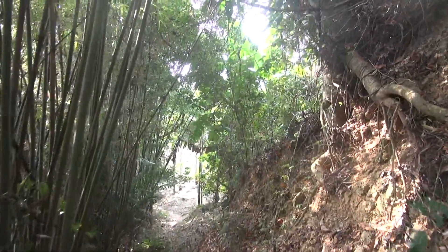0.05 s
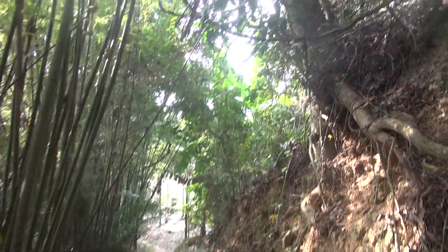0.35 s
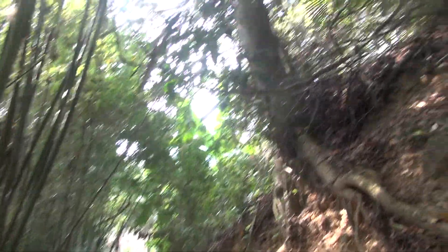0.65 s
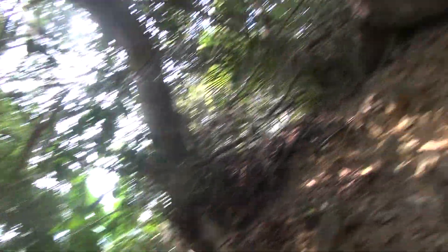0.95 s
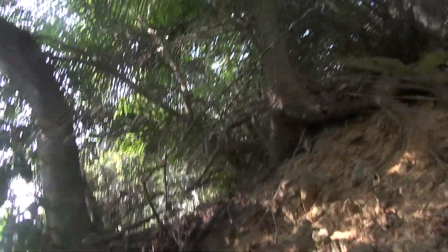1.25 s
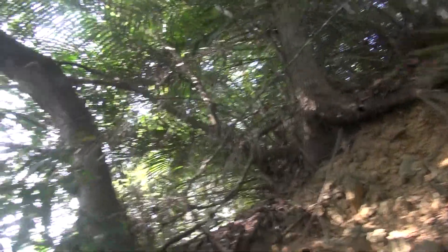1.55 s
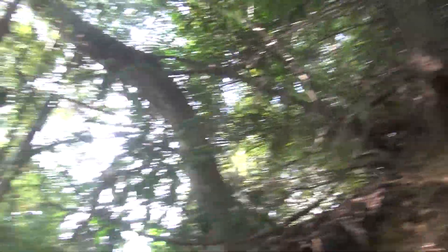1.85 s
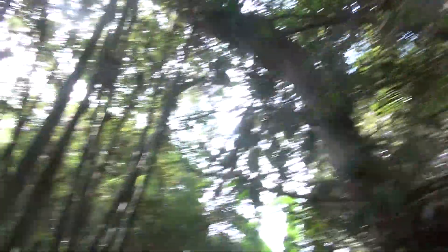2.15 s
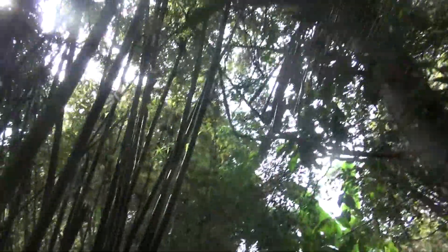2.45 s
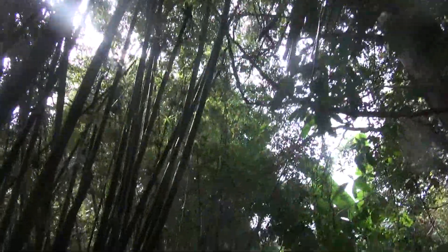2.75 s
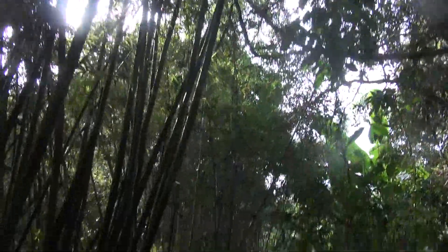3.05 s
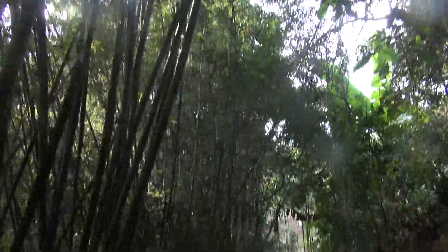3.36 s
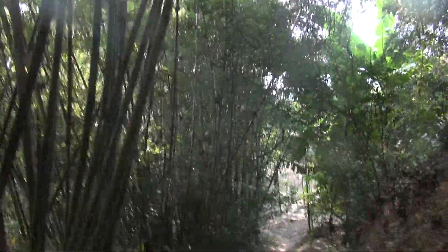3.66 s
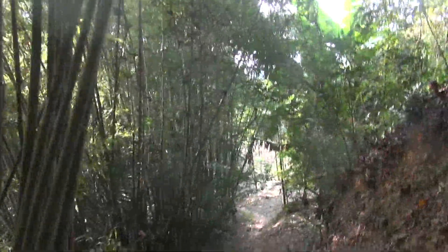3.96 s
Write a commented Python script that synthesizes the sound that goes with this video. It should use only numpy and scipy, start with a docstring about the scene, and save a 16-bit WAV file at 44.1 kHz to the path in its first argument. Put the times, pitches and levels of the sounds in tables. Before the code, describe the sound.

A creaking, insect-like rattle rises at about 0.7 seconds, slightly left, pulsing roughly eight times a second with a hollow, raspy tone. It roughens, weakens after 2.8 seconds and stops near 3.7. Close by, a twig snap and leaf crunch come at 0.2 seconds, then soft bumps; more snaps, crunches and shuffling follow from 3.2, with a bump at 3.7. A very high hiss and low outdoor murmur continue throughout.

```python
"""A shaded bamboo grove. A creaking rattle, perhaps an insect, swells about eight times a second:
in each swell a train of uneven snaps speeds up and slackens, ringing a small hollow body under a
higher rasp and a thin fizz. Close by, twigs snap, dry leaves crunch, and there are a few soft bumps
and some shuffling. Behind it all sit a very high, steady hiss and a low outdoor murmur."""
import sys
import numpy as np
from scipy import signal
from scipy.fft import rfft, irfft
from scipy.io import wavfile

SR = 44100
rng = np.random.default_rng(int(sys.argv[2]) if len(sys.argv) > 2 else 0)


def inscribe(sig):
    """Save sig as 16-bit PCM at rate SR to the path in sys.argv[1].

    A 1-D sig is mono; a 2-D sig holds one channel per row.
    Samples are clipped to [-1, 1] before scaling.
    """
    pcm = np.round(np.clip(np.atleast_2d(sig).T, -1, 1) * 32767)
    wavfile.write(sys.argv[1], SR, pcm.astype(np.int16))


N = 176400
T = np.arange(N) / SR
HZ = np.maximum(np.fft.rfftfreq(N, 1 / SR), 1)

# The rattle's swells: (peak time [s], snap rate at the peak [1/s], relative level [dB],
# upper rasp pitch [Hz], upper rasp level [dB])
SWELLS = [(.735, 290, -56, 2540, -58), (.809, 300, -46, 2650, -51), (.897, 282, -41, 2590, -51.5),
          (.989, 283, -39.5, 2640, -50), (1.098, 303, -36, 2580, -49.5), (1.208, 296, -36, 2570, -46),
          (1.327, 302, -35.5, 2596, -49), (1.452, 318, -35.5, 2700, -50), (1.578, 296, -35.5, 2630, -47.5),
          (1.70, 303, -36.5, 2592, -47.5), (1.827, 297, -37, 2590, -50.5), (1.949, 292, -36.5, 2710, -53.5),
          (2.078, 302, -38.5, 2740, -51), (2.205, 293, -36, 2780, -49.5), (2.338, 300, -37.5, 2693, -47),
          (2.47, 287, -37, 2640, -47), (2.602, 304, -37.5, 2685, -50.5), (2.738, 308, -38.5, 2680, -48.5),
          (2.868, 292, -40, 2560, -47.5), (3.003, 294, -41, 2612, -47.5), (3.133, 295, -42, 2632, -49.5),
          (3.265, 312, -42.5, 2660, -49), (3.398, 322, -42, 2693, -49.5), (3.533, 310, -43.5, 2698, -50.5),
          (3.642, 305, -48.5, 2685, -65)]
# How far the snap rate climbs into a peak: (time [s], depth [share of the peak rate])
RATE_CLIMB = [(1.1, .22), (1.45, .17), (1.65, .09), (2.0, .09), (2.3, .17), (3.3, 0.19)]
# The rattle's place, left of centre: (time [s], pan [dB])
RATTLE_PAN = [(.8, 2.5), (1.8, 3), (2.64, 0.3), (3.6, 1.2)]
def rattle():
    """Snaps quicken into each swell and ring a hollow body; they roughen as the call goes on."""
    peak_times, peak_rates, *_ = np.transpose(SWELLS)
    peak_rate = np.interp(T, peak_times, peak_rates)
    slack = slackness(peak_times)
    sag = np.minimum(in_time(RATE_CLIMB) * slack, .8)
    rate = peak_rate * (1 + .011 * drift(hz=45)) * (1 - sag)
    drive = snaps(rate, jitter=over_call(.011, .017) + .012 * slack, friction=over_call(.25, .5))
    creak = hollow_body(drive, peak_rate, sag) + upper_rasp(slack)
    creak = butter(creak, 2965, "low", order=8)
    sheen = fizz(drive)
    placed = pan(in_time(RATTLE_PAN)) * (creak + from_db(-8) * stem_scatter(creak))
    return from_left(placed) + sheen


def snaps(rate, jitter, friction, spread_db=1.1, accent=.15):
    """Uneven strong-weak clicks, each trailing friction noise; jitter is a share of the period."""
    phase = np.cumsum(rate) / SR
    onsets = np.flatnonzero(np.diff(np.floor(phase)))
    shift, force = rng.standard_normal((N, 2))[:len(onsets)].T
    strength = from_db(spread_db * force) * (1 + accent * (-1) ** np.arange(len(onsets)))
    landings = onsets + shift * jitter[onsets] * SR / rate[onsets]
    clicks = np.zeros(N)
    clicks[np.clip(landings, 0, N - 1).astype(int)] = strength
    scrape = rng.standard_normal(N) * np.exp(-2 * (phase % 1))
    return rms_one(rms_one(clicks) + friction * rms_one(scrape))


def over_call(early, late, t=T):
    """Morph a setting from its early to its late value between 1.71 and 3.06 s."""
    return early + (late - early) * np.clip((t - 1.71) / (3.06 - 1.71), 0, 1)


def slackness(peak_times, climb_s=.05, hold_s=.016, drop_s=.018):
    """How slack the snapping is: zero at each peak and just after, growing between swells."""
    since = T - peak_times[:, None]
    away = np.maximum(-since / climb_s, (since - hold_s) / drop_s)
    return np.clip(away.min(axis=0), 0, 1.6) ** 1.4


def pulsing(rise_s, fall_s=.0033):
    """The rattle's envelope: all swells summed in power, their peaks widening late in the call."""
    return np.sqrt(sum((from_db(db) * swell(s, rise_s, fall_s, over_call(.0078, .014, s))) ** 2
                       for s, _, db, *_ in SWELLS))


# The body's modes: (pitch [Hz], width [Hz], early gain [dB], late gain [dB], envelope lead [s])
BODY_MODES = [(953, 84, -6, -7.5, 0.0099), (1496, 160, -6.5, 0.5, 0.0064), (1950, 330, -1.5, 2, 0.011),
              (2395, 140, 2.5, 5, -0.0037), (2890, 450, -8, 0.5, -0.00049)]
def hollow_body(drive, peak_rate, sag, level_db=-48.5):
    """Snaps ring five modes that brighten over the call, and a gliding ring that accents each peak."""
    effort = pulsing(rise_s=.056)
    modes = np.zeros(N)
    for k, (hz, width_hz, early_db, late_db, lead_s) in enumerate(BODY_MODES):
        envelope = from_db(over_call(early_db, late_db)) * np.interp(T + lead_s, T, effort)
        modes += (-1) ** k * envelope * resonance(drive, hz, width_hz)
    ring_hz = 7 * peak_rate * (1 - .35 * sag)   # the snaps' 7th partial, partly following their sag
    ring = moving_resonance(drive * pulsing(rise_s=.028), ring_hz, width_hz=196)
    return from_db(level_db) * rms_one(modes + from_db(over_call(7.5, 3.5)) * ring)


def upper_rasp(slack, snaps_per_s=340, bend=.035):
    """A second, rougher train of snaps rings a higher resonance that bends up into each peak."""
    peak_times, _, _, pitches, _ = np.transpose(SWELLS)
    drive = snaps(np.full(N, snaps_per_s), jitter=np.full(N, .1), friction=.5)
    ring_hz = np.interp(T, peak_times, pitches) * (1 - bend * slack)
    ring = rms_one(moving_resonance(drive, ring_hz, width_hz=217))
    power = np.zeros(N)
    for s, *_, db in SWELLS:
        length = min(s / 1.06, 1) ** 4   # the first, quicker swells are shorter
        envelope = swell(s - .014 * length, rise_s=.032 * length, fall_s=.013, hold_s=.032 * length)
        power += (from_db(db) * envelope) ** 2
    return ring * np.sqrt(power)


# The fizz's tone: (frequency [Hz], gain [dB])
FIZZ_EQ = [(3000, -13.5), (4300, -19.5), (5500, -5.5), (6500, -6.5), (8000, -4), (9500, -10.5),
           (12000, -12)]
def fizz(drive):
    """Wide, bright noise with a trace of the snaps; it rides the swells and lingers between them."""
    noise = coloured(.3 * drive + rng.standard_normal((2, N)), FIZZ_EQ)
    envelope = pulsing(rise_s=.032, fall_s=.033) + from_db(-6.5) * pulsing(rise_s=.13, fall_s=.13)
    return noise * envelope * from_db(over_call(-22.5, -17.5))


def stem_scatter(x, t60_s=.33, predelay_s=.006):
    """The stems scatter sound into a short tail, nearly the same at both ears."""
    tails = rng.standard_normal((3, N)) * from_db(-60 * T / t60_s) * (T > predelay_s)
    response = tails[0] + .11 * tails[1:]
    response /= np.sqrt(np.sum(response[0] ** 2))
    return signal.fftconvolve(x[None], response, axes=1)[:, :N]


# Twig cracks: (time [s], relative level [dB], low cut [Hz])
TWIGS = [(.1717, -31, 7000), (.1723, -31, 7000), (3.2326, -39, 5500), (3.4518, -28, 9000),
         (3.4577, -32, 9500)]
def twig_snaps(decay_s=.0003, high_cut_hz=13300):
    """Twigs break in tiny, sharp bursts of bright noise."""
    fibres = rng.choice([-1, 1], N)
    cracks = np.zeros(N)
    for s, db, low_cut_hz in TWIGS:
        burst = fibres * from_db(db) * np.exp(-np.abs(T - s) / decay_s) * (T > s)
        cracks += butter(burst + 1e-18, [low_cut_hz, high_cut_hz], "band", order=3)
    return 2 * pan(1) * cracks


# Leaf crunches: (time [s], level [dB], rise [s], fall [s])
CRUNCHES = [(0.179, -43.5, 0.018, .013), (3.246, -48, 0.0058, 0.013), (3.341, -44, 0.02, 0.023),
            (3.456, -47, 0.0033, 0.013)]
# Their tone: (frequency [Hz], gain [dB])
CRUNCH_EQ = [(200, -5), (500, 16.5), (1000, 19.5), (1600, 16), (3000, 15), (5000, 11), (8000, 6.5),
             (13000, 5), (17000, -30)]
def leaf_crunches(grain_db=2.5):
    """Dry leaves crunch in short swells of grainy noise."""
    grains = rng.standard_normal(N) * from_db(grain_db * rng.standard_normal(N))
    return pan(1) * coloured(grains, CRUNCH_EQ) * gestures(CRUNCHES)


# Soft bumps: (time [s], level [dB], pitch [Hz], 60 dB decay [s], grit mix [ratio])
BUMPS = [(.248, -40.5, 433, 0.073, 0.63), (0.515, -36, 264, 0.023, 0.47), (1.115, -44.5, 268, 0.037, 0.85),
         (3.722, -34.5, 295, 0.023, .3)]
def bumps(attack_s=.00026, grit_top_hz=850):
    """Dull knocks: a short low ring with a puff of grit."""
    knocks = np.zeros(N)
    for s, db, hz, t60, grit in BUMPS:
        age = np.maximum(T - s, 0)
        puff = rms_one(butter(rng.standard_normal(N), grit_top_hz, "low", order=6))
        envelope = from_db(db - 60 * age / t60) * (1 - np.exp(-age / attack_s))
        knocks += envelope * (np.sin(2 * np.pi * hz * age) + grit * puff)
    return pan(3.5) * butter(knocks, 130, "high", order=2)


# Shuffles on the path: (time [s], level [dB], rise [s], fall [s])
SCUFFS = [(.35, -57.5, 0.26, 0.39), (3.25, -57, 0.66, 0.29), (3.629, -53, 0.043, 0.015),
          (3.828, -54, 0.054, 0.039)]
# Their tone: (frequency [Hz], gain [dB])
SCUFF_EQ = [(100, -21), (200, -3), (300, -7), (400, -2.5), (520, -13.5), (800, -13.5), (3000, -65)]
def scuffs():
    """Soft shuffling: low, muffled noise that fades in and out."""
    return pan(3) * coloured(rng.standard_normal(N), SCUFF_EQ) * gestures(SCUFFS)


# The hiss's tone: (frequency [Hz], gain [dB])
HISS_EQ = [(11500, -8), (12500, -7.5), (14000, -3), (15200, -2), (16400, 2)]
# Its fader ride: (time [s], relative level [dB])
HISS_RIDE = [(0.0, -45), (0.23, -41.5), (0.26, -44), (0.49, -43.5), (0.7, -45), (1.97, -43.5),
             (2.21, -41.5), (3.55, -40.5), (3.58, -44), (4.0, -45.5)]
def high_hiss(low_cut_hz=11530, flicker_db=1.37, trim_db=2):
    """A faintly flickering hiss at the top of hearing, from straight ahead."""
    noise = butter(coloured(rng.standard_normal(N), HISS_EQ), low_cut_hz, "high", order=16)
    level_db = in_time(HISS_RIDE) + trim_db + flicker_db * drift(hz=22)
    return pan(.1) * rms_one(noise) * from_db(level_db)


# The outdoor bed's tone: (frequency [Hz], gain [dB])
MURMUR_EQ = [(15, -48), (30, -26), (45, -12), (60, -6), (76, 0), (98, -6), (130, 2), (200, -0.5),
             (300, -1.5), (600, -2.5), (1000, -1.5), (1400, -3.5), (2200, -5.5), (3500, -9.5),
             (5000, -13.5), (9000, -16.5), (11000, -15.5), (16000, -7.5)]
# Its fader ride: (time [s], level [dB])
MURMUR_RIDE = [(0, -48.5), (.45, -49), (.7, -49), (1.6, -50.5), (2.4, -49), (3.2, -49.5), (4, -49)]
# Its lean: (frequency [Hz], left minus right [dB])
MURMUR_BALANCE = [(60, 2.5), (200, 2.5), (450, 6.5), (1300, 6.5), (2400, 5.5), (4400, 0.5), (9000, 2)]
# How narrow it sounds: (frequency [Hz], left-right correlation [0-1])
MURMUR_CORRELATION = [(100, 1), (1500, 0.89), (3000, 0.84), (5000, 0.68), (9000, 0), (12000, 0.97)]
def outdoor_murmur():
    """Distant murmur and leaf noise, leaning left: narrow in the lows, widest near 9 kHz."""
    mid, side = rfft(rng.standard_normal((2, N)))
    alike = np.clip(at_hz(MURMUR_CORRELATION), 0, .999)
    stereo = np.sqrt(1 + alike) * mid + np.sqrt(1 - alike) * side * [[1], [-1]]
    noise = irfft(stereo * pan(at_hz(MURMUR_BALANCE) / 2), N)
    return coloured(noise, MURMUR_EQ) * from_db(in_time(MURMUR_RIDE))


def from_db(db):
    """Decibels to gain."""
    return 10 ** (np.asarray(db) / 20)


def rms_one(x):
    """Scale to unit rms."""
    return x / np.sqrt(np.mean(x ** 2) + 1e-20)


def in_time(rows):
    """A curve at every sample."""
    return np.interp(T, *np.transpose(rows))


def at_hz(points):
    """A curve at every frequency, on a log axis."""
    hz, value = np.transpose(points)
    return np.interp(np.log(HZ), np.log(hz), value)


def coloured(x, eq):
    """Shape a noise with an EQ curve; rms 1."""
    return rms_one(irfft(rfft(x) * from_db(at_hz(eq)), N))


def butter(x, hz, kind, order):
    """Butterworth filter."""
    return signal.sosfilt(signal.butter(order, hz, kind, fs=SR, output="sos"), x)


def drift(hz):
    """A random wobble, mostly slower than hz; rms 1."""
    return rms_one(butter(rng.standard_normal(N), hz, "low", order=2))


def resonance(x, hz, width_hz):
    """Two-pole resonance with peak gain 1."""
    r = np.exp(-np.pi * width_hz / SR)
    poles = [1, -2 * r * np.cos(2 * np.pi * hz / SR), r * r]
    return signal.lfilter(np.array([1, 0, -1]) * (1 - r * r) / 2, poles, x + 1e-18)


def moving_resonance(x, hz, width_hz):
    """A steep-sided resonance whose centre follows hz; peak gain 1."""
    turn = np.exp(2j * np.pi * np.cumsum(hz) / SR)
    r = np.exp(-np.pi * width_hz / SR)
    return 2 * np.real(turn * signal.lfilter([(1 - r) ** 2], [1, -2 * r, r * r], x / turn))


def swell(s, rise_s, fall_s, hold_s=0):
    """An envelope that grows, stays full for hold_s either side of time s, and dies away."""
    return np.exp(-np.maximum(s - hold_s - T, 0) / rise_s - np.maximum(T - s - hold_s, 0) / fall_s)


def gestures(rows):
    """One envelope from a list of swells."""
    return sum(from_db(db) * swell(s, rise_s, fall_s) for s, db, rise_s, fall_s in rows)


def pan(db):
    """Gains that lift the left and lower the right by db each."""
    return from_db(np.array([[1], [-1]]) * db)


def from_left(x, lag_s=.000023):
    """Sound from the left reaches the right ear a little later."""
    return np.array([x[0], irfft(rfft(x[1]) * np.exp(-2j * np.pi * HZ * lag_s), N)])


def scene():
    """The rattle over the grove's bed, with small sounds close by."""
    grove = rattle() + high_hiss() + outdoor_murmur()
    return grove + from_left(bumps() + scuffs()) + leaf_crunches() + twig_snaps()


def record(dry):
    """A brick-wall high cut at 16.5 kHz."""
    return irfft(rfft(dry) / np.sqrt(1 + (HZ / 16500) ** 1200), N)


dry = scene()
out = record(dry)
inscribe(out)
```